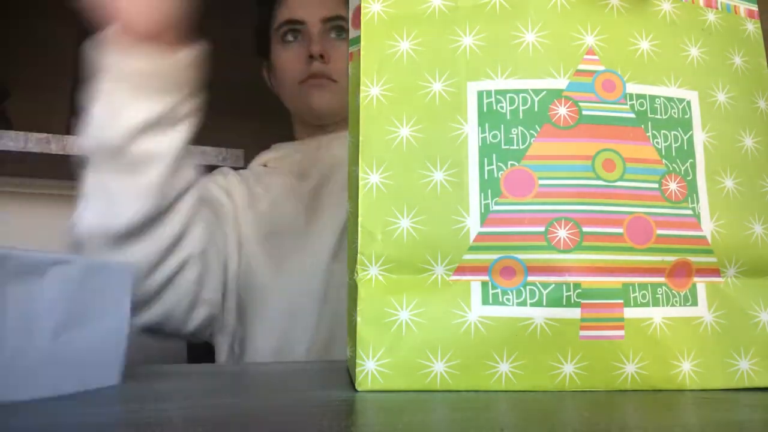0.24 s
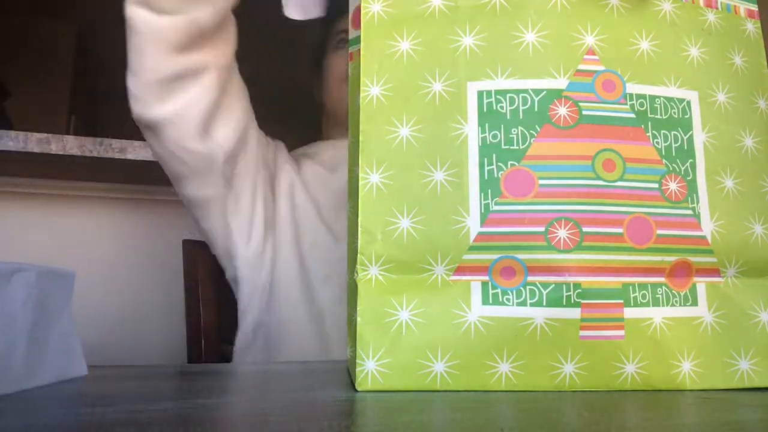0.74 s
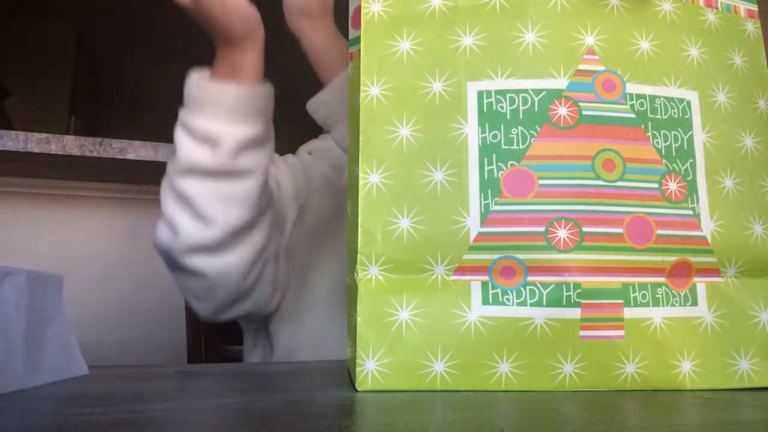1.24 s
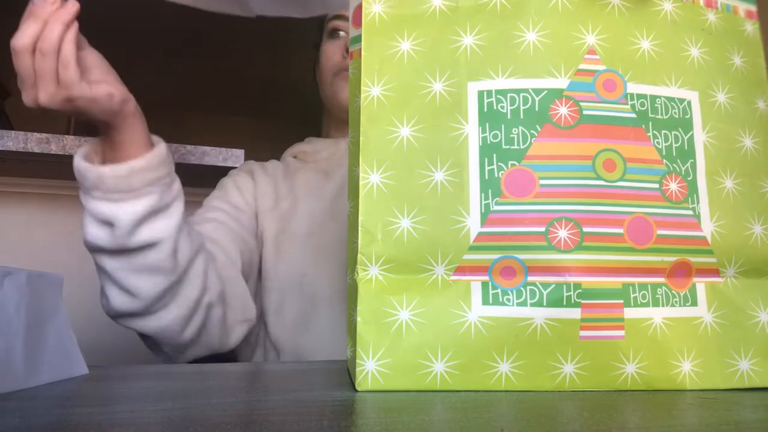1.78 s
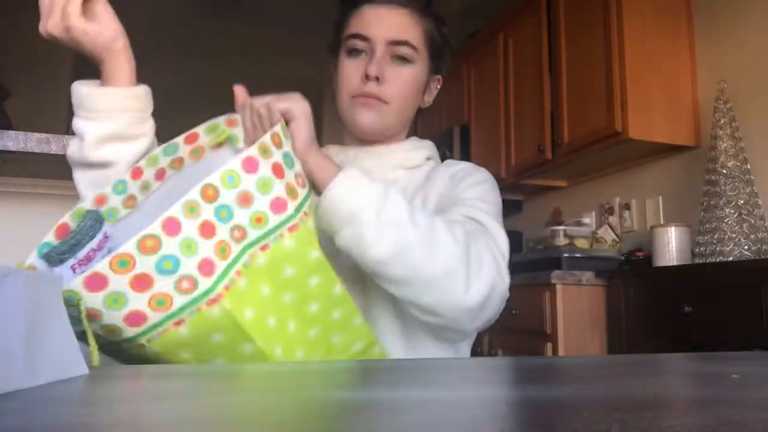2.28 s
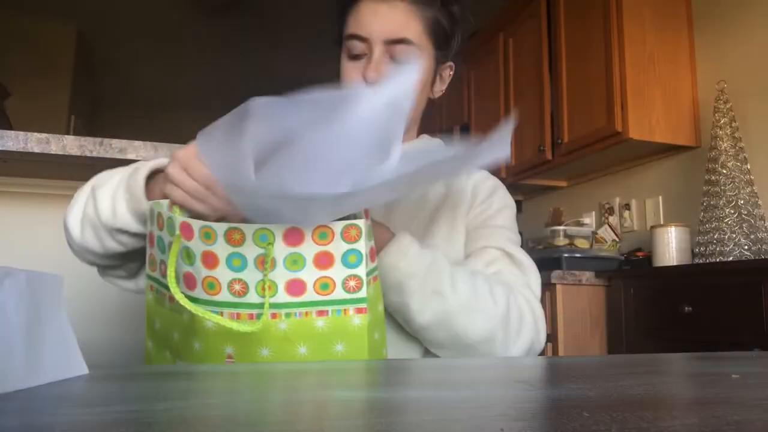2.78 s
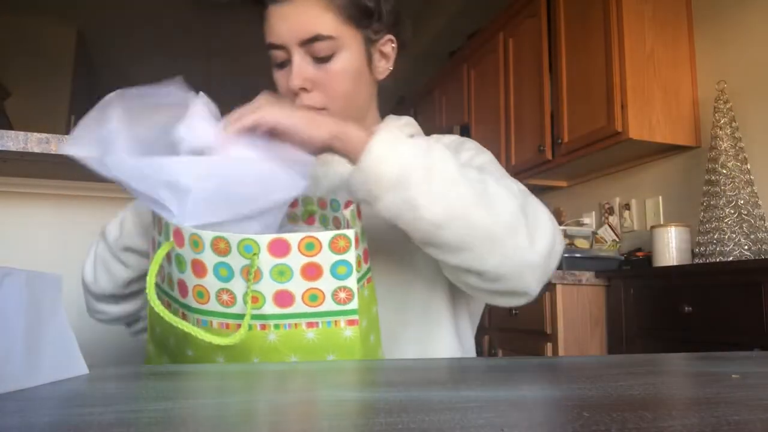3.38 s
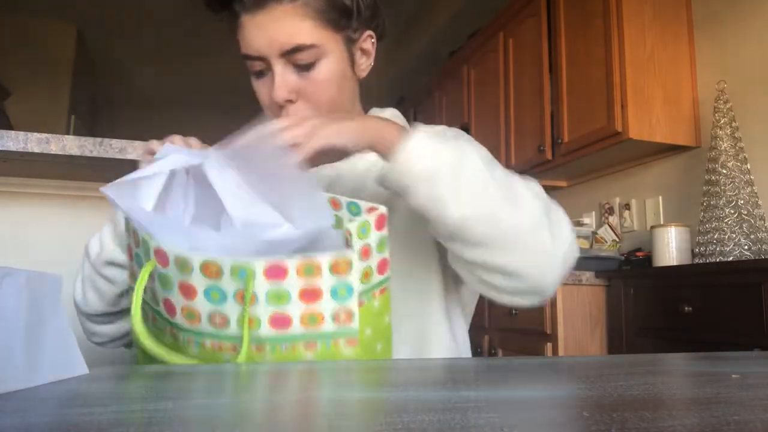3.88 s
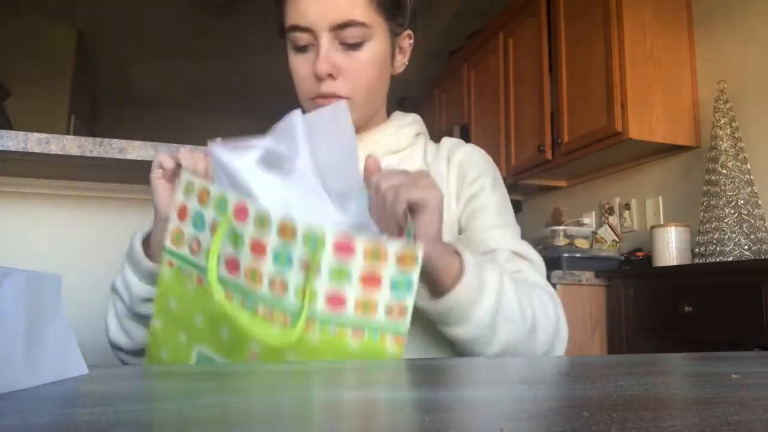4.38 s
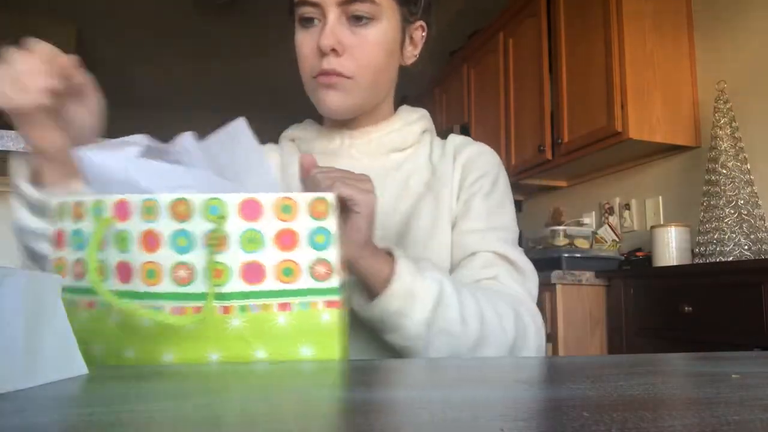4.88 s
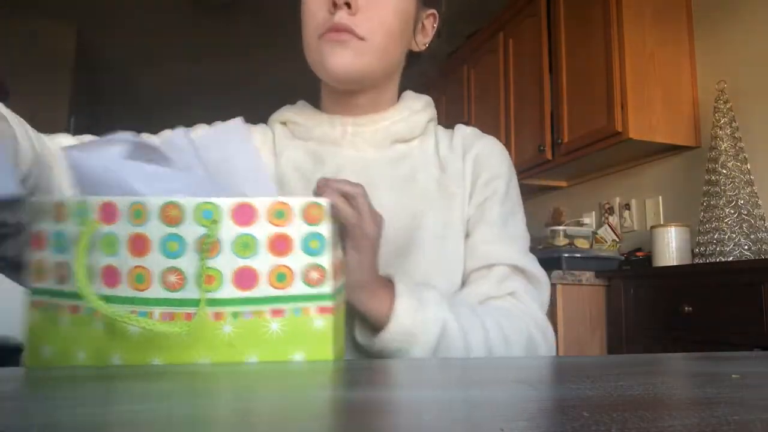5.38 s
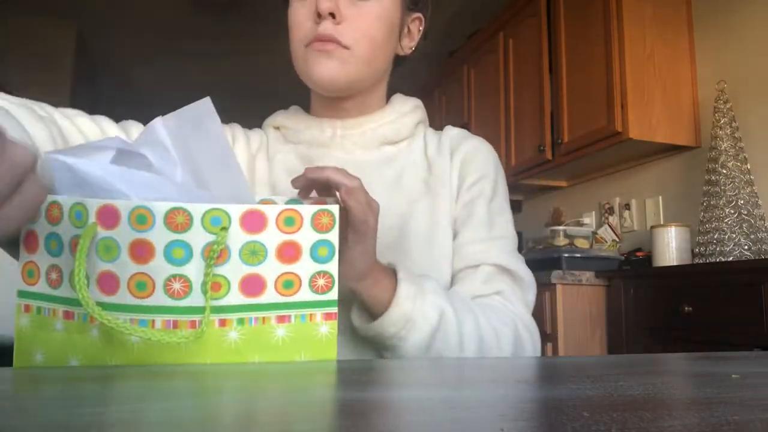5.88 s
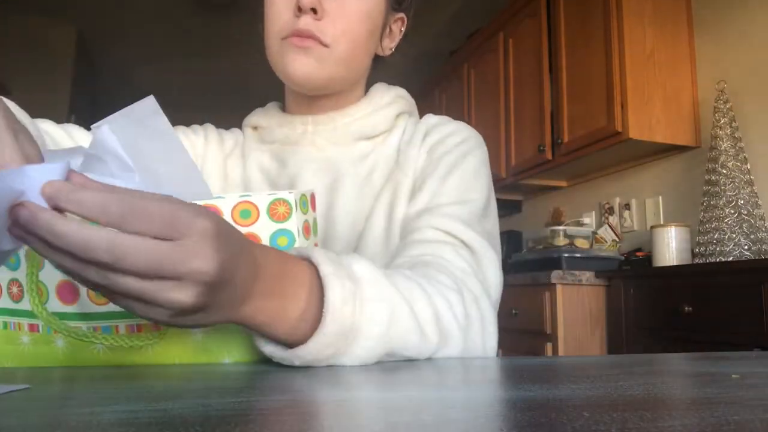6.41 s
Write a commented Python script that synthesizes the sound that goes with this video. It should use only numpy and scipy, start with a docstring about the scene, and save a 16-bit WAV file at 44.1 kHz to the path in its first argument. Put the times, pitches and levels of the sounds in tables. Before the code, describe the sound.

Close rustling and crinkling of tissue paper being pushed into a gift bag, with sharp crackles as the bag is handled.

```python
"""In a quiet kitchen, tissue paper is shaken out, gathered and pushed into a stiff paper gift bag.
The thin tissue hisses as it catches and slips countless times, and its creases flip with bright ticks.
The bag scrapes, its panels buckle with sharp snaps, and its base bumps the table.
It all happens close to the microphone, and the room adds a short ring and a faint steady hush."""
import sys
import numpy as np
from scipy import signal
from scipy.fft import rfft, irfft
from scipy.io import wavfile

SR = 44100
rng = np.random.default_rng(int(sys.argv[2]) if len(sys.argv) > 2 else 0)


def unload_wav(signal):
    """Save mono or channel-first audio to the path in sys.argv[1] as 16-bit WAV at rate SR, clipped to [-1, 1]."""
    wavfile.write(
        sys.argv[1],
        SR,
        np.round(np.clip(np.atleast_2d(signal).T, -1, 1) * 32767).astype(np.int16),
    )


N = 293265
T = np.arange(N) / SR

# shakes of the open sheet: (start [s], rise [s], hold [s], hiss level [dB], flap relative to hiss [dB])
SHAKES = [(0.0, 0.0013, 0.14, -39.5, -5.5), (0.109, 0.025, 0.17, -46, -3.5),
          (0.353, 0.035, 0.041, -39.5, -12), (0.442, 0.039, 0.04, -41, -10.5),
          (0.542, 0.055, 0.023, -36.5, -11.5), (0.62, 0.054, 0.0087, -32.5, -12),
          (0.69, 0.037, 0.12, -41.5, -8), (0.847, 0.027, 0.11, -41.5, -9.5), (1.0, 0.05, 0.081, -53, -16),
          (1.157, 0.0043, 0.12, -39.5, -4.5), (1.355, 0.056, 0.14, -44, -7),
          (1.623, 0.023, 0.016, -42, -7.5), (1.695, 0.0037, 0.013, -53, -3)]
# two fixed peaks in the rustle: (pitch [Hz], width [Hz], level [dB])
RUSTLE_PEAKS = [(2130, 370, -16.5), (3120, 180, -12)]
# the bag's panels buckling: (time [s], strength [dB], ring pitch [Hz], relative treble [dB])
SNAPS = [(0.086, -41.5, 674, 7), (0.215, -36, 996, -6), (0.239, -42.5, 2730, 4), (1.856, -32, 1380, -52),
         (1.886, -36, 2420, -36), (1.897, -27.5, 2030, -8), (1.903, -39, 2150, -22),
         (1.9212, -20.5, 4400, -0.5), (1.955, -23.5, 2290, -5), (1.9665, -25.5, 2320, -16),
         (1.989, -22, 995, -11), (2.0126, -28, 2260, -27.5), (2.0206, -23, 2290, -17),
         (2.032, -33, 2460, -23), (2.05, -28, 2300, -23), (2.143, -32, 1200, -43), (2.17, -22, 1800, -4.5),
         (2.1806, -24.5, 2140, -2.5), (2.193, -27.5, 2550, -11), (2.211, -26.5, 1680, -19),
         (2.228, -21, 2140, -7.5), (2.251, -36, 1840, -1), (2.312, -36, 960, -36), (2.416, -37, 2930, -5),
         (2.421, -28.5, 2000, 4.5), (2.52, -41, 1430, 2), (2.561, -35.5, 3650, -7),
         (3.9172, -15, 3344, -14.5), (4.0171, -35, 3400, -6), (4.085, -39.5, 1740, -16),
         (4.105, -30.5, 1220, -10), (4.173, -34.5, 1600, -38), (4.223, -30.5, 1680, -29),
         (4.267, -34, 1830, -8), (4.272, -25.5, 1790, -16), (4.2876, -25.5, 1970, -2),
         (4.3381, -25, 1780, 4.5), (4.344, -25.5, 1740, -23), (4.386, -35.5, 1000, -10),
         (4.391, -34.5, 990, -12), (4.452, -29, 1276, -15), (4.483, -42, 1520, -25),
         (4.528, -29, 1600, -32), (4.617, -36, 1640, -62), (4.787, -42, 1130, -13), (4.8689, -39, 1800, -8),
         (5.3239, -34, 1800, -6), (5.341, -24.5, 1980, -13), (5.368, -22.5, 3510, -17),
         (5.3746, -24.5, 1315, -8.5), (5.415, -35, 935, -23), (5.457, -32, 606, -23),
         (5.534, -31.5, 1380, -14), (5.556, -34, 1140, -20), (5.679, -30, 3350, -28),
         (5.928, -40, 830, -29), (6.045, -33.5, 3010, -11), (6.1515, -40, 735, -8)]
# the bag's base and the arms meeting the table: (time [s], level [dB], brightness [Hz])
BUMPS = [(0.088, -53.5, 250), (0.217, -54.5, 255), (0.273, -60, 99), (0.304, -78, 100), (1.858, -48.5, 348),
         (1.906, -48, 350), (1.961, -55.5, 200), (2.064, -56, 250), (2.505, -64, 350), (3.277, -63, 220),
         (3.9217, -32, 1110), (3.927, -46, 450), (4.271, -58, 302), (4.35, -68, 250), (4.561, -53.5, 490),
         (4.651, -58.5, 597), (5.455, -55, 500), (5.683, -51, 1000), (6.15, -77, 400)]
# natural notes of the bag and the air in it: (pitch [Hz], relative level [dB], time to fade by 60 dB [s])
BAG_NOTES = [(90, -23.5, 0.12), (136.7, -15, 0.15), (165.5, -16.5, 0.065), (245.6, 1.5, 0.045),
             (428.5, -11, 0.23), (561, 2.5, 0.052), (610, -14.5, 0.071), (676, 2, 0.12), (795, 3.5, 0.085),
             (950, -4, 0.09), (1250, 2, 0.075), (1390, 1.5, 0.059), (1587, 4.5, 0.15), (1775, 11, 0.055),
             (2040, -2, 0.17)]
# tissue creases flipping: (time [s], strength [dB], boosted pitch [Hz], swish relative to tick [dB])
CREASES = [(0.215, -28.5, 7900, -2.5), (1.074, -25, 10000, -18), (1.1573, -30, 12000, -7),
           (1.234, -24, 11900, -9), (1.3265, -31, 11000, -1), (1.378, -31, 12000, -28),
           (1.391, -26, 12000, -22), (1.4927, -27, 12500, -22), (1.634, -31.5, 12200, -1),
           (1.701, -34, 11000, -16), (2.703, -27.5, 5800, 0), (5.8515, -38, 8900, -22),
           (6.2924, -14, 5900, -25), (6.3795, -19, 6200, -15), (6.3892, -23, 7900, -39),
           (6.556, -42, 5100, -8)]
# the bag dragged or gripped: (start [s], rise [s], hold [s], scrape level [dB], rumble level [dB])
DRAGS = [(1.729, 0.047, 0.096, -47.5, -50.5), (1.849, 0.054, 0.17, -32, -42.5),
         (2.124, .012, 0.1, -37.5, -53), (2.274, 0.017, 0.13, -50, -77), (2.386, 0.04, 0.02, -37, -74),
         (2.484, 0.02, 0.017, -45, -51), (2.55, 0.018, 0.094, -48, -73), (3.868, 0.045, 0.11, -38.5, -50),
         (4.053, 0.019, 0.087, -47, -52), (4.21, 0.04, 0.1, -39, -60), (4.36, 0.15, 0.078, -40, -56),
         (4.615, 0.011, 0.018, -40, -53), (4.765, 0.028, .02, -47, -57), (4.93, 0.026, 0.019, -49, -52),
         (5.282, 0.085, 0.14, -45, -51), (5.523, 0.011, 0.025, -35, -68), (5.565, 0.035, .015, -43, -48.5),
         (5.662, 0.025, .01, -34.5, -44), (6.03, 0.017, 0.076, -57, -62), (6.134, 0.016, 0.011, -42.5, -54)]
# pushes on the tissue: (start [s], rise [s], hold [s], level [dB], rustle relative to that level [dB])
PUSHES = [(1.798, 0.18, 0.035, -37.5, -7), (2.161, 0.015, 0.074, -39, 8), (2.302, 0.03, 0.07, -60, 5),
          (2.407, 0.063, 0.075, -45.5, -1.5), (2.575, 0.031, 0.122, -49.5, -1.5),
          (2.691, 0.024, 0.059, -39, -1.5), (2.758, 0.046, 0.21, -35.5, -1),
          (3.024, 0.072, 0.011, -33.5, -1), (3.126, 0.051, 0.14, -36.5, -2),
          (3.268, 0.065, 0.13, -38.5, -0.5), (3.42, 0.129, 0.053, -35.5, -2), (3.565, 0.1, 0.06, -40, 0),
          (3.719, 0.085, 0.049, -41, -1), (3.867, 0.039, 0.11, -36, -6), (4.031, 0.041, 0.14, -44.5, -0.5),
          (4.235, 0.058, 0.12, -44, -7), (4.464, 0.1, 0.012, -45, 5), (4.619, 0.077, 0.14, -52, 1),
          (4.881, 0.084, 0.036, -54, 8), (5.046, 0.024, 0.008, -51.5, 2), (5.112, 0.032, 0.22, -47.5, -1.5),
          (5.358, 0.024, 0.23, -41.5, -0.5), (5.641, 0.064, 0.019, -54, 3), (5.782, 0.016, 0.15, -52.5, -1),
          (5.948, 0.16, 0.097, -42.5, -1.5), (6.194, 0.11, 0.083, -49, 1),
          (6.42, 0.022, 0.067, -56.5, -4.5), (6.555, 0.004, 0.01, -51, 0)]

# tone curves, how strong each sound is from low to high: (frequency [Hz], relative level [dB])
OPEN_SHEET_TONE = [(80, -46), (170, -15), (270, -8.5), (450, -3.5), (700, -1.5), (1400, -1.5), (2300, -1),
                   (3200, -4.5), (4200, -6), (5800, -5.5), (7500, -1), (9500, 3), (13000, 1.5),
                   (15500, -0.5)]
SNAP_TONE = [(60, -26.5), (130, -26), (300, -5.5), (700, -3.5), (1700, -2), (3200, -5.5), (4500, -10.5),
             (7000, -14.5), (11000, -28.5), (16000, -26)]
CRACK_TONE = [(300, -46.5), (1000, -10.5), (2200, -2), (3600, 0), (5000, -4), (7500, -11), (11000, -19.5),
              (16000, -18)]
TICK_TONE = [(200, -22.5), (700, -11.5), (2200, -2.5), (4500, -10.5), (7000, -11), (11000, -9), (16000, -9)]
SCRAPE_TONE = [(250, -2), (450, 10.5), (700, 7.5), (1100, 7.5), (1600, 6), (2400, 3), (3400, -0.5),
               (4500, -7.5), (7000, -10.5), (10000, -12.5), (15500, -42)]
RUMBLE_TONE = [(40, -45), (80, -10), (125, -17.5), (220, -11.5), (330, -9.5), (600, -30)]
BUNCHED_TONE = [(80, -42), (170, -21.5), (250, -2), (330, -7.5), (560, -2), (1100, -2.5), (1600, 0),
                (2100, 1), (2700, -1), (3200, -0.5), (4100, -3), (7000, -2.5), (11000, -4), (15500, -9)]
ROOM_TONE = [(30, -5), (100, 2), (300, 4), (1000, -4), (4000, -6), (16000, -20)]

# held paper keeps rubbing between strokes: (start [s], end [s], level [dB])
SHEET_HELD, BUNCH_HELD, BAG_HELD = (0.0, 1.76, -56.5), (1.8, 4.5, -65.5), (4.0, 5.3, -63.5)
# how a stroke weakens: (drop while it lasts [dB], fade once the hand stops [s])
SHAKE_FADE, PUSH_FADE, DRAG_FADE = (3.5, 0.032), (3.5, 0.027), (4.5, 0.017)


def gain(db):
    """Turn decibels into a number to multiply by."""
    return 10 ** (np.asarray(db) / 20)


def unit(x):
    """Scale a sound to an average power of one."""
    return x / np.sqrt(np.mean(x ** 2) + 1e-20)


def add(track, at, sound):
    """Mix a sound into a track at a time in seconds."""
    i = max(int(at * SR), 0)
    track[i:i + len(sound)] += sound[:max(N - i, 0)]


def level_at(curve, hz):
    """Look up a tone curve's level in dB at the given frequencies."""
    curve_hz, db = np.transpose(curve)
    return np.interp(np.log(np.maximum(hz, 1)), np.log(curve_hz), db)


def colour(x, curve, size=4096):
    """Shape a sound with a tone curve, keeping the sharp front of each click."""
    cepstrum = irfft(np.log(gain(level_at(curve, np.fft.rfftfreq(size, 1 / SR)))))
    # fold the second half onto the first, so the filter never sounds ahead of a click
    cepstrum[1:size // 2] *= 2
    cepstrum[size // 2 + 1:] = 0
    response = irfft(np.exp(rfft(cepstrum)))
    return signal.fftconvolve(x, response)[:len(x)]


def band(x, lo_hz, hi_hz):
    """Keep the part of a sound between two frequencies."""
    edges = [lo_hz, min(hi_hz, SR / 2 - 100)]
    return signal.sosfilt(signal.butter(2, edges, "band", fs=SR, output="sos"), x)


def split(x, hz):
    """Return the parts of a sound below and above a frequency."""
    low = signal.sosfiltfilt(signal.butter(3, hz, fs=SR, output="sos"), x)
    return low, x - low


def slips(per_s, spread_db, flurry_db, flurry_hz):
    """Paper catches and slips, making many tiny clicks and a few big ones, in uneven flurries."""
    happens = rng.random(N) < per_s / SR
    size = gain(spread_db * np.minimum(rng.standard_exponential(N), 4))
    steps = rng.standard_normal(8192)
    wander = np.interp(T * flurry_hz, np.arange(len(steps)), steps)
    flurry = gain(flurry_db * np.clip(wander, -2, 2))
    return unit(happens * size * rng.choice([-1, 1], N) * flurry)


def effort(strokes, levels_db, fade):
    """Loudness of hand strokes over time: each builds up, sags while it lasts, then dies away."""
    sag_db, release_s = fade
    power, t = np.zeros(N), T[:SR // 2]
    for (start, rise, hold, *_), db in zip(strokes, levels_db):
        build = np.clip(t / rise, 0, 1)
        sag = gain(-sag_db * np.clip((t - rise) / hold, 0, 1))
        release = np.exp(-np.maximum(t - rise - hold, 0) / release_s)
        add(power, start, (gain(db) * build * sag * release) ** 2)
    return np.sqrt(power)


def held(span, fade_s=0.017):
    """Loudness of the faint, even rubbing of paper that is just being held."""
    start, end, db = span
    return gain(db) * np.clip((T - start) / fade_s, 0, 1) * np.clip((end - T) / fade_s + 1, 0, 1)


def papery_ring(x):
    """Two fixed peaks near 2.1 and 3.1 kHz give the rustle a papery ring."""
    return x + sum(gain(db) * band(x, hz - width / 2, hz + width / 2) for hz, width, db in RUSTLE_PEAKS)


def open_tissue(held_flap_db=-2):
    """The loose sheet slides over itself with a hiss and fine crinkles; its free part flaps lower down."""
    sliding = slips(per_s=24000, spread_db=3.5, flurry_db=1.5, flurry_hz=97)
    crinkles = slips(per_s=270, spread_db=4.5, flurry_db=0.0, flurry_hz=12)
    flap, hiss = split(colour(sliding + gain(-7) * crinkles, OPEN_SHEET_TONE), hz=5700)
    _, _, _, hiss_db, flap_db = np.transpose(SHAKES)
    holding = held(SHEET_HELD)
    hissing = np.hypot(effort(SHAKES, hiss_db, SHAKE_FADE), holding)  # hypot adds the two powers
    flapping = np.hypot(effort(SHAKES, hiss_db + flap_db, SHAKE_FADE), gain(held_flap_db) * holding)
    return unit(hiss) * hissing + unit(papery_ring(flap)) * flapping


def panel_rings(ring_s=0.0034, detune=0.11, creak_s=0.0004, creak_db=-12, ring_db=-12):
    """A panel of the bag creaks just before it buckles, then rings with three close notes."""
    out, t, lead_in = np.zeros(N), T[:SR // 20], T[:SR // 100]
    for at, db, hz, _ in SNAPS:
        offsets = np.linspace(-1, 1, num=3) + 0.64 * rng.standard_normal(size=3)
        pitches = hz * np.exp(detune * offsets)[:, None]
        phase = 2 * np.pi * rng.random(pitches.shape)
        notes = np.sin(2 * np.pi * pitches * t + phase).sum(axis=0)
        ring = notes * np.exp(-t / ring_s) * (1 - np.exp(-t * hz))
        swell = np.exp(-lead_in[::-1] / creak_s)
        creak = unit(band(rng.standard_normal(len(lead_in)), 590, 3400)) * swell
        add(out, at, gain(db + ring_db) * unit(ring))
        add(out, at - lead_in[-1], gain(db + creak_db) * creak)
    return out


def bag_cracks(click_s=0.00072, treble_share=0.34, crack_db=5.5):
    """A crease in the bag gives way with a tiny click, hardest in the brightest snaps."""
    out, t = np.zeros(N), T[:SR // 200]
    for at, db, _, treble_db in SNAPS:
        click = unit(rng.standard_normal(len(t)) * np.exp(-t / click_s))
        add(out, at, gain(db + treble_share * treble_db) * click)
    return gain(crack_db) * colour(out, CRACK_TONE)


def bag_snaps(burst_s=0.0021, tail_s=0.011, tail_db=-14, lag_s=0.0002, bass_db=-3, usual_treble_db=-10):
    """Ripples cross a buckling panel: the treble comes first, the bass comes later and lasts longer."""
    out, t = np.zeros(N), T[:SR // 7]
    for hz in 141 * 2 ** (np.arange(14) / 2):  # bands half an octave apart
        slowness = (1500 / hz) ** 0.61
        age = np.maximum(t - lag_s * slowness, 0)
        front = 1 - np.exp(-age / (0.0002 * slowness))
        fade = np.exp(-age / (burst_s * slowness)) + gain(tail_db) * np.exp(-age / (tail_s * slowness))
        bursts = rng.standard_normal((len(SNAPS), len(t))) * front * fade
        ripples = band(bursts, hz / 2 ** (1 / 4), hz * 2 ** (1 / 4))
        width_gain = np.sqrt(hz / 1500)  # higher bands are wider, so they carry more
        for ripple, (at, db, _, treble_db) in zip(ripples, SNAPS):
            tint = [(400, bass_db), (1100, 0), (3000, 0), (6000, treble_db - usual_treble_db)]
            band_db = db + level_at(SNAP_TONE, hz) + level_at(tint, hz)
            add(out, at, unit(ripple) * gain(band_db) * width_gain)
    return gain(-21.5) * out


def hollow_bag(x, ring_db=-14.5):
    """Whatever happens on the bag's walls also sets its natural notes ringing."""
    t = T[:SR // 4]
    hz, note_db, fade_s = np.transpose(BAG_NOTES)[:, :, None]
    decay = np.log(1000) / fade_s
    notes = gain(note_db) * 2 * decay / SR * np.cos(2 * np.pi * hz * t) * np.exp(-decay * t)
    return x + gain(ring_db) * signal.fftconvolve(x, notes.sum(axis=0))[:N]


def bag_bumps(rise_s=0.0025, rattle_s=0.016, rattle_db=-3):
    """A bump starts all the bag's notes and rattles its walls; a soft one stirs mostly the low notes."""
    out, t = np.zeros(N), T[:SR // 3]
    hz, note_db, fade_s = np.transpose(BAG_NOTES)[:, :, None]
    sign = (-1) ** np.arange(len(hz))[:, None]  # neighbouring notes push the panel opposite ways
    notes = sign * gain(note_db) * np.sin(2 * np.pi * hz * t) * np.exp(-np.log(1000) * t / fade_s)
    for at, db, bright_hz in BUMPS:
        ring = np.sum(notes / (1 + (hz / bright_hz) ** 3), axis=0)
        burst = rng.standard_normal(len(t)) * np.exp(-t / rattle_s)
        rattle = band(burst, 100 + bright_hz / 6, 100 + 1.3 * bright_hz)
        front = 1 - np.exp(-t / rise_s)
        add(out, at, gain(db) * (unit(ring) + gain(rattle_db) * unit(rattle)) * front)
    return band(out, 87, 20000)


def tissue_creases(tick_s=0.0011, swish_s=0.019, ring_db=3):
    """A crease flips with a bright tick, higher for a shorter fold, and sets the sheet nearby sliding."""
    out, t = np.zeros(N), T[:SR // 10]
    for at, db, hz, swish_db in CREASES:
        fade = np.exp(-t / tick_s) + gain(swish_db) * np.exp(-t / swish_s)
        tick = rng.standard_normal(len(t)) * fade
        ring = band(tick, hz / 1.44, hz * 1.58)
        add(out, at, gain(db) * (tick + gain(ring_db) * ring))
    return colour(out, TICK_TONE)


def bag_scrape():
    """Stiff paper catches and slips on the table and fingers; the broad panels rumble with it."""
    rubbing = slips(per_s=1800, spread_db=4.0, flurry_db=4.0, flurry_hz=160)
    _, _, _, scrape_db, rumble_db = np.transpose(DRAGS)
    scraping = np.hypot(effort(DRAGS, scrape_db, DRAG_FADE), held(BAG_HELD))
    scrape = unit(colour(rubbing, SCRAPE_TONE)) * scraping
    rumble = unit(colour(rubbing, RUMBLE_TONE)) * effort(DRAGS, rumble_db, DRAG_FADE)
    return scrape + rumble


def bunched_tissue():
    """Many folds rub and crinkle at once; the tighter the bunch, the fuller its lower rustle."""
    sliding = slips(per_s=14000, spread_db=2.5, flurry_db=2.5, flurry_hz=69)
    crinkles = slips(per_s=320, spread_db=5.5, flurry_db=4.0, flurry_hz=14)
    rustle, hiss = split(unit(colour(sliding + gain(-9.5) * crinkles, BUNCHED_TONE)), hz=5400)
    _, _, _, db, rustle_db = np.transpose(PUSHES)
    hissing = np.hypot(effort(PUSHES, db, PUSH_FADE), held(BUNCH_HELD))
    rustling = np.hypot(effort(PUSHES, db + rustle_db, PUSH_FADE), held(BUNCH_HELD))
    return hiss * hissing + papery_ring(rustle) * rustling


def kitchen(x, fade_s=0.31, echo_db=-11):
    """Cupboards and walls send back a short, slightly dull ring."""
    t = T[:SR // 2]
    front = np.clip(t / 0.004 - 0.6, 0, 1)
    tail = rng.standard_normal(len(t)) * np.exp(-np.log(1000) * t / fade_s) * front
    tail /= np.sqrt(np.sum(tail ** 2))
    tail = colour(tail, [(100, -3), (800, 1), (2500, -1.5), (6000, -6.5), (15000, -13)])
    return x + gain(echo_db) * signal.fftconvolve(x, tail)[:N]


def scene():
    """Mix the tissue and the bag in the kitchen, over the room's faint steady hush."""
    tissue = open_tissue() + bunched_tissue() + tissue_creases()
    buckling = bag_snaps() + panel_rings() + bag_cracks()
    bag_walls = band(bag_scrape() + buckling, 146, 20000)  # the scrape and the buckling carry almost no deep bass
    hush = gain(-65) * unit(colour(rng.standard_normal(N), ROOM_TONE))
    return (kitchen(tissue + hollow_bag(bag_walls) + bag_bumps()) + hush)[None]


def record(dry, bass_hz=78, top_hz=15900):
    """A small microphone thins the deep bass; the highest treble is cut off steeply."""
    thin = signal.sosfilt(signal.butter(3, bass_hz, "high", fs=SR, output="sos"), dry)
    return signal.sosfilt(signal.ellip(10, 0.1, 80, top_hz, fs=SR, output="sos"), thin)


dry = scene()
out = record(dry)
unload_wav(out)
```